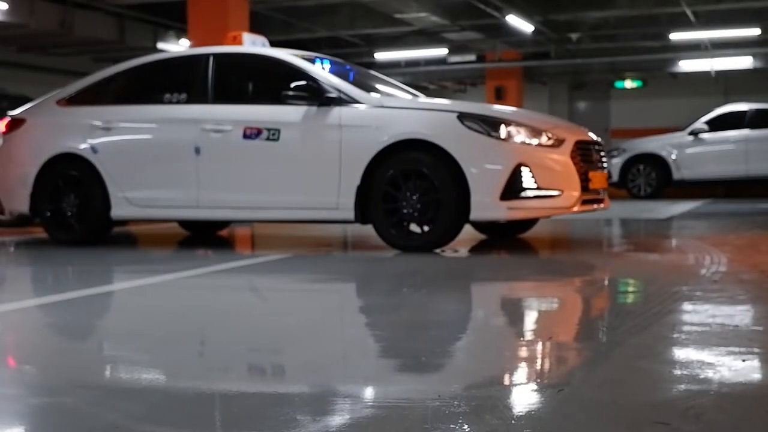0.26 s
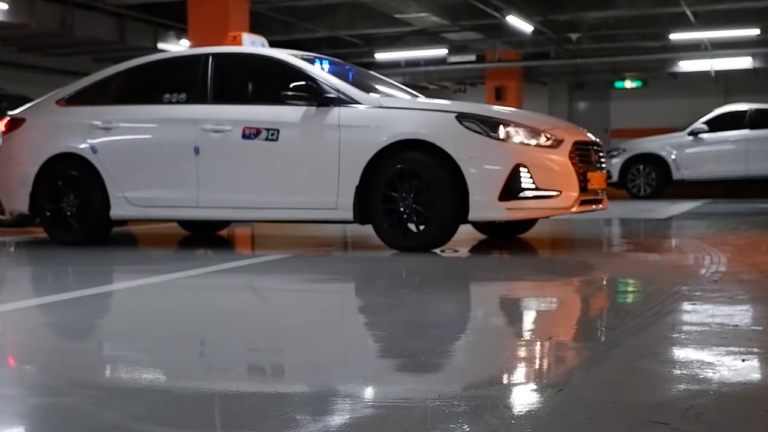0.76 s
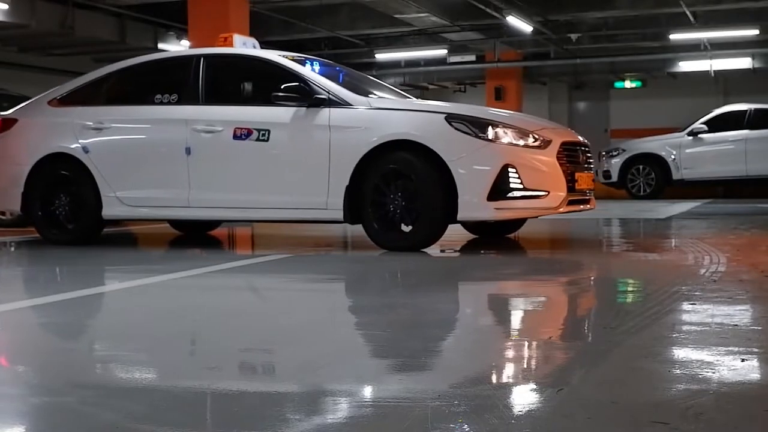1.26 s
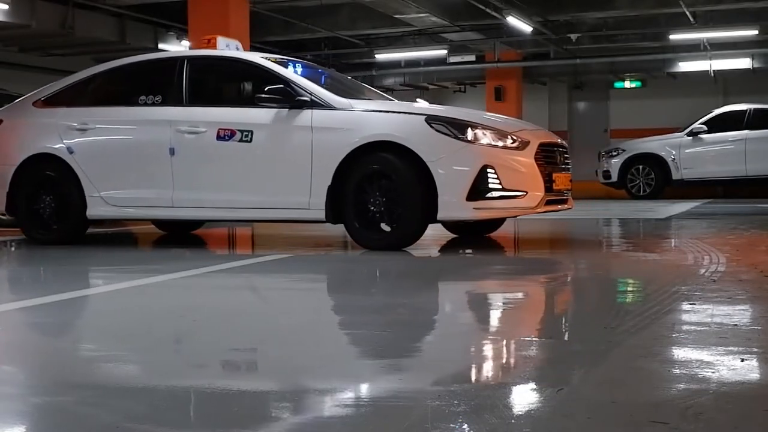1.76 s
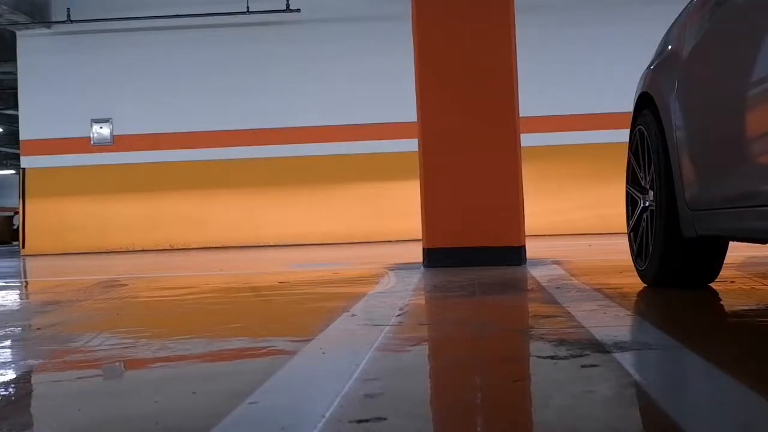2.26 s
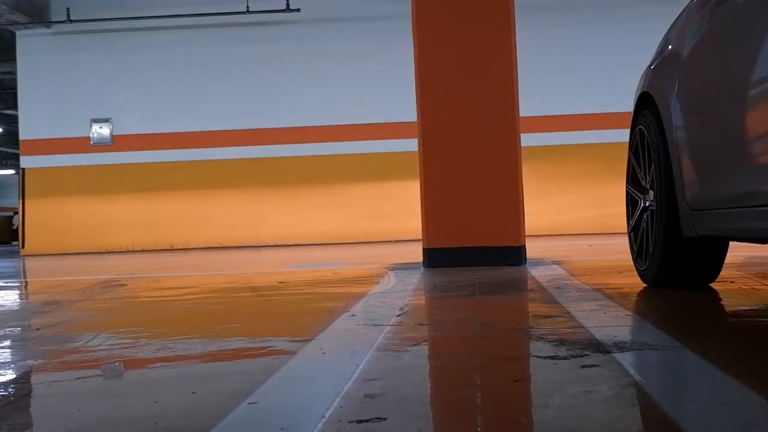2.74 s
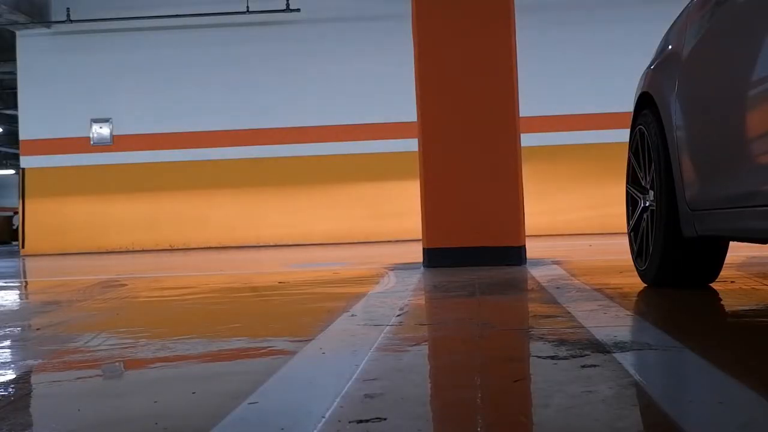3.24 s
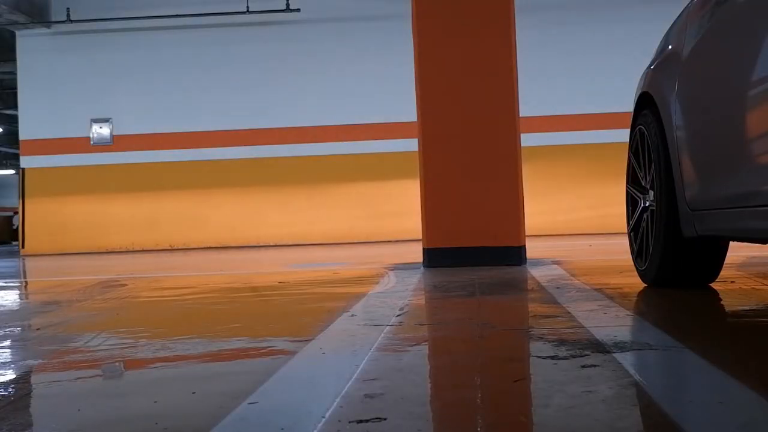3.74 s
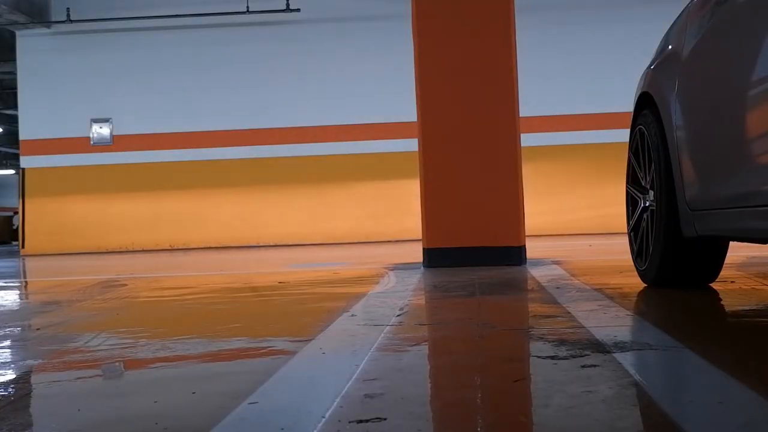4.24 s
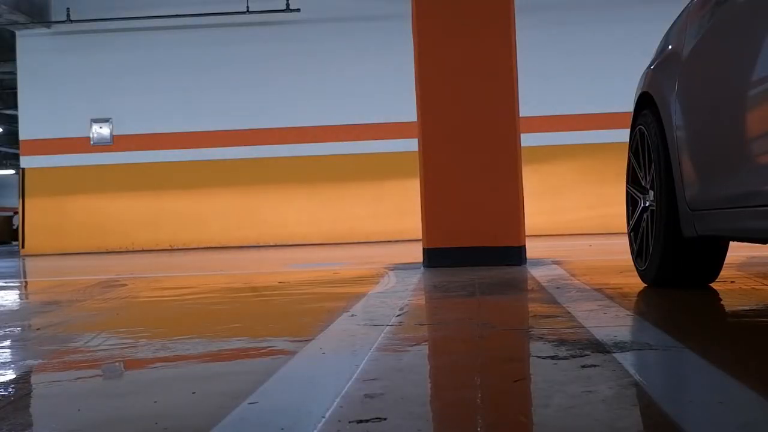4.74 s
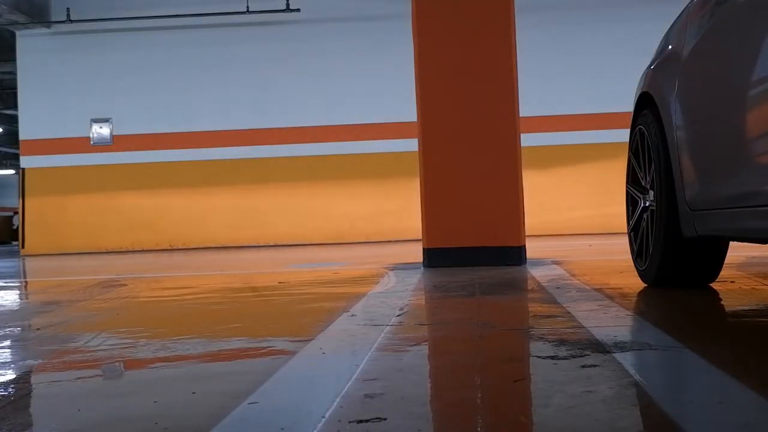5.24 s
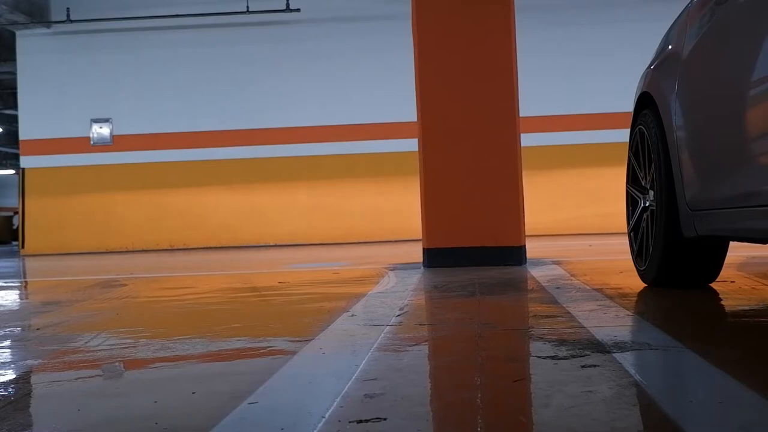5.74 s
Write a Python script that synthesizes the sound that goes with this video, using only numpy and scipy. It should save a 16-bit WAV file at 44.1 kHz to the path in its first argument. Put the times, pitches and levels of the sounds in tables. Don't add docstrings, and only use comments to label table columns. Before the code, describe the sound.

Beside a stationary car in a concrete car park, an even engine roar stops climbing and lets go, trailing reverberation and bright little clicks while quiet room air comes up. An abrupt cut brings the microphones close behind a car: deep exhaust pulses rise to a full, boomy rev, slow down into a dull low idle, then pick up in a smaller rev that is still held at the end.

```python
import sys
import numpy as np
from scipy import signal
from scipy.fft import rfft, irfft
from scipy.io import wavfile
from scipy.ndimage import uniform_filter1d

SR = 44100
rng = np.random.default_rng(int(sys.argv[2]) if len(sys.argv) > 2 else 0)


def master(y):
    cut = np.clip(np.atleast_2d(y).T, -1, 1)
    pcm = np.round(cut * 32767)
    wavfile.write(sys.argv[1], SR, pcm.astype(np.int16))


def invert_db(level):
    return 10 ** (np.asarray(level, dtype=float) / 20)


N = 264600
CUT_S = 1.976


def frequencies(size):
    return np.arange(size // 2 + 1) * SR / size


def shape(x, points):
    hz, db = np.transpose(points)
    f = frequencies(x.shape[-1]) + 1
    gain_db = np.interp(np.log(f), np.log(hz), db)
    return irfft(rfft(x) * invert_db(gain_db), x.shape[-1])


def unit(x):
    return x / np.sqrt(np.mean(x ** 2))


def noise(*shape_of_noise):
    return rng.standard_normal(shape_of_noise)


def read(table, start, size):
    s, *columns = np.transpose(table)
    t = np.arange(start, start + size) / SR
    return [np.interp(t, s, column) for column in columns]


def walk(rate, size):
    k = int(SR / rate)
    steps = np.repeat(noise(size // k + 1), k)
    return uniform_filter1d(uniform_filter1d(steps, k), k)[:size]


def echo(x, t60, wet_db):
    t = np.arange(3 * SR) / SR
    tail = noise(len(t)) * np.exp(-np.log(1000) * t / t60)
    tail = tail / np.sqrt(np.sum(tail ** 2))
    return x + invert_db(wet_db) * signal.fftconvolve(x, tail)[:len(x)]


def hum(turns, orders_db, t60, wet_db):
    tone = 0
    for k, db in enumerate(orders_db):
        unsteady_db = db + 1.1 * walk(31, len(turns))
        tone = tone + invert_db(unsteady_db) * np.sin(2 * np.pi * (k + 1) * turns)
    return echo(np.sqrt(2) * tone, t60, wet_db)


def side_hum(turns, since_lift):
    held_db, fade_db_per_s, waver_db = -47, 68, 4.5
    first_db = held_db - fade_db_per_s * since_lift + waver_db * walk(6.8, len(turns))
    return hum(turns, [first_db], t60=6.6, wet_db=-1.0)


def ports(shared, own, lag, alike_hz, least):
    f = frequencies(len(shared))
    alike = np.clip(least + (1 - least) / (1 + (f / alike_hz) ** 1.9), 0, 1)
    delay = np.exp(-1j * np.pi * f * lag / SR * np.array([[1], [-1]]))
    return np.sqrt(alike) * rfft(shared) * delay + np.sqrt(1 - alike) * rfft(own)


PART_HZ = [170, 700, 2500, 6000, 14000]


def roar(turns, parts_db, colour, gate, lag, alike_hz, least, wet_db, lowest=0):
    size, count = len(turns), len(parts_db)
    edges_hz = PART_HZ[lowest:]
    puff = np.exp(0.92 * np.cos(2 * np.pi * turns))
    shared, *own = unit(np.array([echo(v, 0.58, wet_db) for v in noise(3, size)]))
    at_ports = irfft(ports(shared, np.array(own), lag, alike_hz, least), size)
    heard = rfft(shape(at_ports, colour))
    f = frequencies(size) + 1
    centres = np.log(np.multiply(edges_hz[:count], edges_hz[1:count + 1])) / 2
    out = 0
    for k, db in enumerate(parts_db):
        share = np.interp(np.log(f), centres, np.arange(count) == k)
        part = irfft(heard * share, size)
        inside = (f > edges_hz[k]) * (f < edges_hz[k + 1])
        band = irfft(heard.mean(axis=0) * inside, size)
        swell_db = db + .5 * walk(6, size) + .5 * walk(25, size)
        out = out + part / band.std() * invert_db(swell_db)
    return out * (1 + gate * (puff / puff.mean() - 1))


# [f/Hz, width/Hz, level/dB]
PORTS = [
    (3500, 300, 3),
    (3960, 260, -11),
    (7300, 500, 2),
]


def housing(x):
    f = frequencies(x.shape[-1])
    peaks_db = sum(db / (1 + (2 * (f - hz) / width) ** 2) for hz, width, db in PORTS)
    return irfft(rfft(x) * invert_db(peaks_db), x.shape[-1])


# [held level/dB, fade after the throttle closes/dB per s]
SIDE_WALLS = [
    (-23.5, 8.5),
    (-22.5, 8),
    (-38, 14),
]
# [f/Hz, level/dB per Hz]
SIDE_COLOUR = [(70, -40), (120, -22), (165, -15), (200, -5.5), (250, -1.5), (330, -3), (370, -9.5),
               (735, -8.5), (1340, -12), (2290, -22), (3460, -30), (4400, -34), (10300, -57), (15300, -89)]


def side_walls(turns, since_lift):
    parts_db = [held_db - fade_db * since_lift for held_db, fade_db in SIDE_WALLS]
    wall = roar(turns, parts_db, SIDE_COLOUR, gate=0.0051, lag=3.2, alike_hz=1640, least=0.34, wet_db=-8.0)
    return housing(wall)


# [t/s, level/dB]
SIDE_BAY = [
    (.8, -47.5),
    (1.0, -53.5),
    (1.13, -60),
    (1.19, -55.5),
    (1.4, -66),
    (1.55, -80),
    (1.95, -61.5),
]
# [f/Hz, level/dB per Hz]
BAY_COLOUR = [(1200, -17), (2200, 3), (3300, 0), (3900, -1), (4400, 1.5), (5600, -4), (7200, -12),
              (8000, -4.5), (8900, -13.5), (11000, -16.5), (13600, -20.5), (14600, -31), (15600, -55)]


def side_bay(turns):
    bay_db = read(SIDE_BAY, 0, len(turns))
    return roar(turns, bay_db, BAY_COLOUR, gate=0.35, lag=1.0, alike_hz=1200, least=0.22, wet_db=-7.0, lowest=3)


# [f/Hz, level/dB per Hz]
RUMBLE = [(25, -38), (45, -18), (65, 6), (110, -13), (190, 35), (260, -46)]


def rumble(level_db, size):
    return invert_db(level_db) * unit(shape(noise(size), RUMBLE))


# [multiple of 22.12 Hz, level/dB]
IDLE_ORDERS = [(2, -8), (3, 0), (4, -5), (5, 1), (6, -5), (7, -4), (8, 4), (9, 4)]


def distant_idle(level_db, size):
    turns = 22.12 * np.cumsum(1 + 0.0058 * walk(2.7, size)) / SR
    tones = 0
    for k, db in IDLE_ORDERS:
        phase = 2 * np.pi * (k * turns + rng.random())
        tones = tones + invert_db(db + 1.5 * walk(5.63, size)) * np.sin(phase)
    return invert_db(level_db) * tones


# [f/Hz, level/dB per Hz]
VENT = [(900, -22), (1400, -20), (1570, -5.5), (1740, -10.5), (1900, -11.5), (2700, -26), (3350, -15.5),
        (3650, -23.5), (4300, -22.5), (5200, -37), (9000, -59)]


def vent(size):
    shared, *own = noise(3, size)
    air = np.array(own) - 0.2 * shared * np.array([[1], [-1]])
    return invert_db(-42.5 + 1.7 * walk(8.1, size)) * unit(shape(air, VENT))


# [f/Hz, level/dB per Hz]
PORT_HISS = [(2500, -10), (4500, 0), (9000, -9), (15000, -18)]


def port_hiss(level_db, size):
    return invert_db(level_db) * unit(shape(noise(2, size), PORT_HISS))


def quiet_garage(size):
    rise = np.interp(np.arange(size) / SR, [.7, 1.6], [0, 1])
    out = rumble(-64 + 8 * rise, size) + distant_idle(-66 + 15 * rise, size)
    out = out + invert_db(-13 + 15 * rise) * housing(vent(size))
    return out + port_hiss(-76 + 16.5 * rise, size)


def beside(size):
    lift_s, held_hz, sag_hz_per_s, lowest_hz = 0.77, 97.9, 64, 39.7
    since_lift = np.maximum(np.arange(size) / SR - lift_s, 0)
    firing_hz = np.maximum(held_hz - sag_hz_per_s * since_lift, lowest_hz)
    turns = np.cumsum(firing_hz) / SR
    engine = side_hum(turns, since_lift) + side_walls(turns, since_lift) + side_bay(turns)
    return engine + quiet_garage(size)


# [t/s, peak level/dB]
TICKS = [(0.8473, -43), (0.8942, -43), (0.9401, -44), (0.97, -45), (0.982, -45), (0.992, -39),
         (1.0207, -39), (1.0574, -42), (1.0758, -45), (1.0958, -48), (1.1576, -43), (1.22, -49)]


def ticks():
    out, t = np.zeros(N), np.arange(160) / SR
    for s, db in TICKS:
        start = int(s * SR)
        out[start:start + len(t)] += invert_db(db + 1) * noise(len(t)) * np.exp(-t / .0007)
    return shape(out, [(5000, -30), (8500, 2), (10000, 9), (14000, -4)])


# [f/Hz, level/dB]
PIPE = [(24, -30), (33, -15), (38, -6), (48, -11), (66, 1), (71.5, 1), (74.5, -13), (84, -5), (99, -17),
        (111, 2), (124, -10), (155, -8), (198, 2), (228, -13)]
UPPER_ORDERS_DB = [0, 1, -2, -7, 1]


def tail_hum(hz, effort_db):
    upper_db = np.minimum(effort_db, -38 + .3 * (effort_db + 38))
    load_db = [effort_db] + [upper_db + db for db in UPPER_ORDERS_DB]
    pipe_hz, pipe_db = np.transpose(PIPE)
    orders_db = [db + np.interp((k + 1) * hz, pipe_hz, pipe_db) for k, db in enumerate(load_db)]
    return hum(np.cumsum(hz) / SR, orders_db, t60=3.8, wet_db=-11)


def follow(hz, level_db, growth_db, lag_s):
    power = invert_db(2 * (level_db + growth_db * np.log2(hz / 40)))
    keep = np.exp(-1 / (max(lag_s, .01) * SR))
    late, _ = signal.lfilter([1 - keep], [1, -keep], power, zi=[keep * power[0]])
    return 10 * np.log10(late)


# [level at 40 Hz/dB, growth/dB per octave of revs, build-up of the garage/s]
TAIL_PARTS = [
    (-32.5, 8, 0.19),
    (-36.5, 8, 0.14),
    (-46, 4.5, 0.05),
    (-62.5, 6, 0.05),
]
COASTING_S = [3.7, 4.15, 4.6, 5.05]
COASTING_DB = [0, -1.5, -5.5, -3]
# [f/Hz, level/dB per Hz]
TAIL_COLOUR = [(70, -18), (120, -11.5), (190, -4), (310, -3.5), (365, -10.5), (560, -8.5), (720, -15),
               (1000, -21), (1400, -20.5), (2400, -27), (3500, -33), (4400, -38.5), (10000, -56),
               (15300, -69)]
# [f/Hz, level/dB]
HOLLOW = [(1450, 0), (1570, 3.5), (1730, 3.5), (1850, 0)]


def tail_roar(hz, start):
    t = np.arange(start, start + len(hz)) / SR
    shut = np.interp(t, COASTING_S, [0, 1, 1, 0])
    parts_db = [follow(hz, *part) + loss_db * shut for part, loss_db in zip(TAIL_PARTS, COASTING_DB)]
    wall = roar(np.cumsum(hz) / SR, parts_db, TAIL_COLOUR,
                gate=0.071, lag=-3.5, alike_hz=1560, least=0.25, wet_db=-8)
    return shape(wall, HOLLOW)


# [t/s, firing rate f/Hz, effort level/dB]
TAIL_HUM = [(1.98, 23.2, -46), (2.31, 32.8, -43), (2.5, 41.5, -39), (2.62, 43, -46), (2.8, 60, -35),
            (2.97, 69.5, -33), (3.1, 70.5, -28), (3.21, 68, -25), (3.28, 63.4, -35), (3.36, 61, -22),
            (3.55, 56.3, -40), (3.85, 51.4, -35), (4.17, 35.3, -48), (4.35, 28.4, -42), (4.62, 24.5, -51),
            (5.1, 33, -37.5), (5.3, 35.5, -43), (5.7, 37.6, -40.5)]


def behind(start, size):
    hz, effort_db = read(TAIL_HUM, start, size)
    rumble_db = follow(hz, level_db=-45, growth_db=2.4, lag_s=0.43)
    low = tail_hum(hz, effort_db) + rumble(rumble_db, size) + distant_idle(-61, size)
    return low + housing(tail_roar(hz, start) + vent(size))


def scene():
    cut = int(CUT_S * SR)
    return np.concatenate([beside(cut), behind(cut, N - cut)], axis=1) + ticks()


def low_pass(x):
    return signal.sosfilt(signal.butter(12, 15640, fs=SR, output="sos"), x)


def record(dry):
    top = signal.butter(4, 15000, fs=SR, output="sos")
    port_gain = invert_db(np.array([[-.16], [.16]]))
    return low_pass(signal.sosfilt(top, dry) * port_gain)


dry = scene()
out = record(dry)
master(out)
```